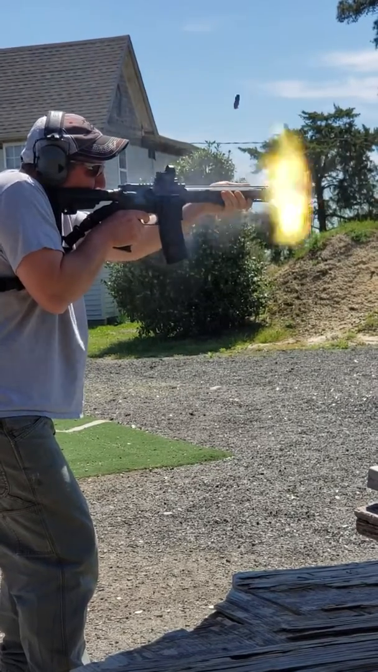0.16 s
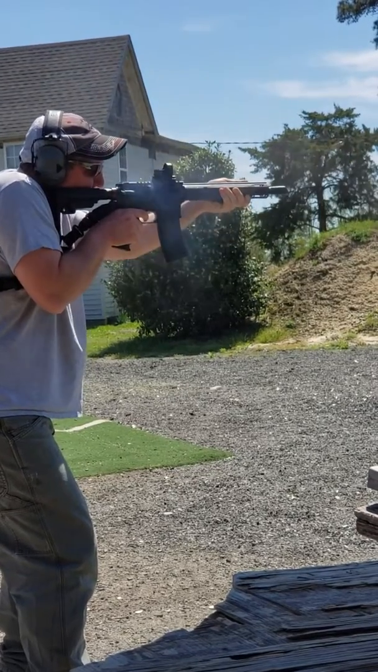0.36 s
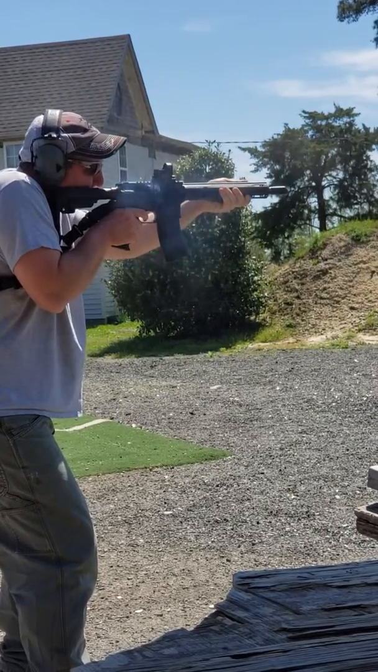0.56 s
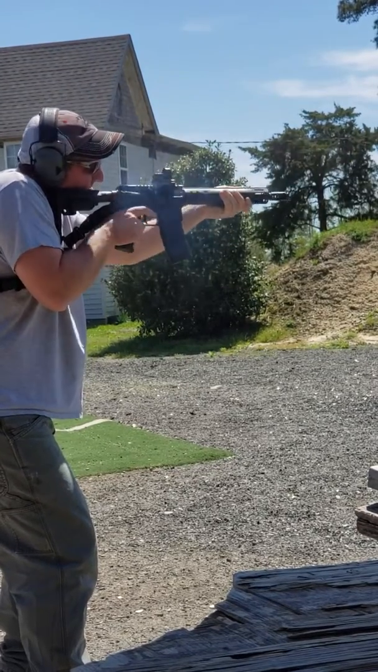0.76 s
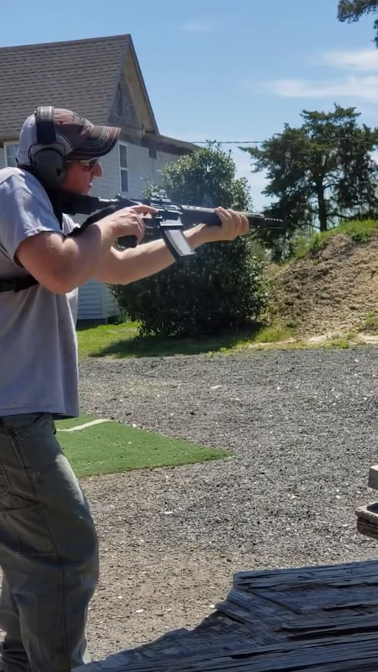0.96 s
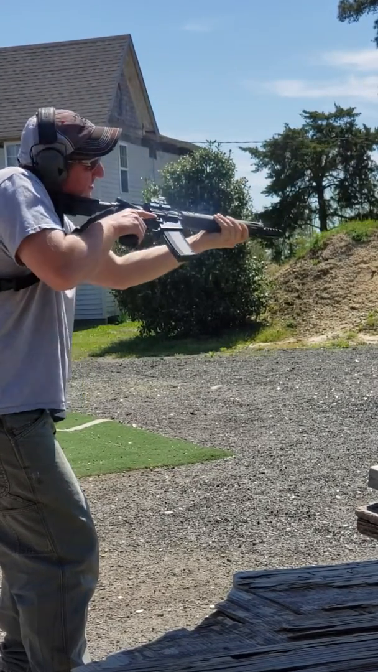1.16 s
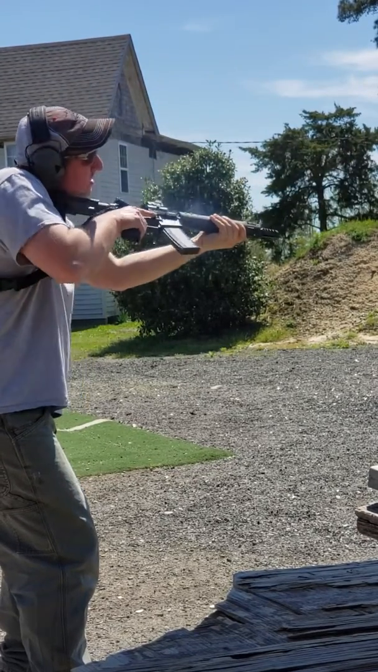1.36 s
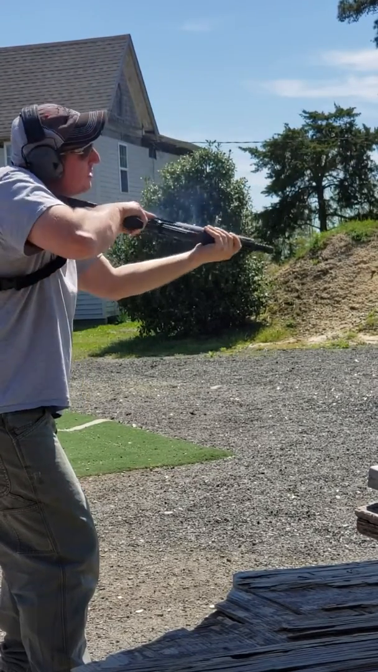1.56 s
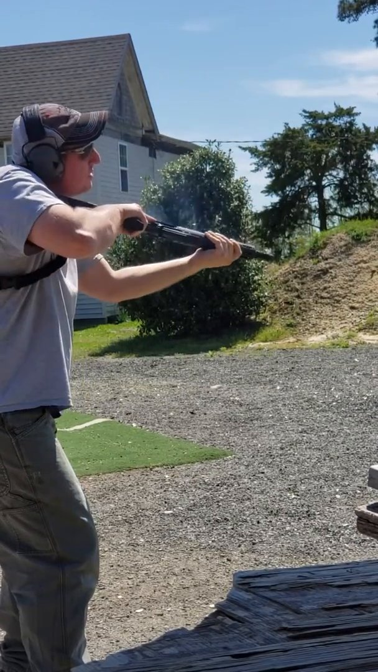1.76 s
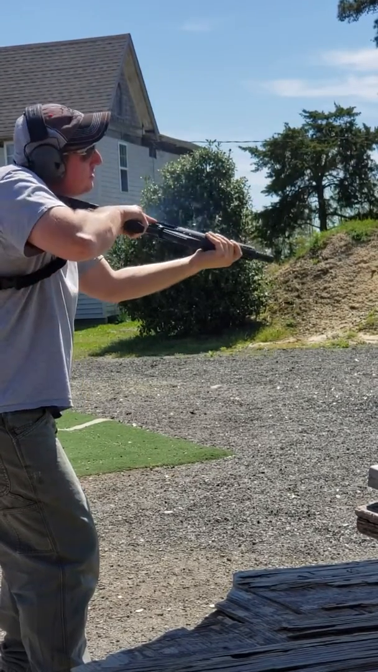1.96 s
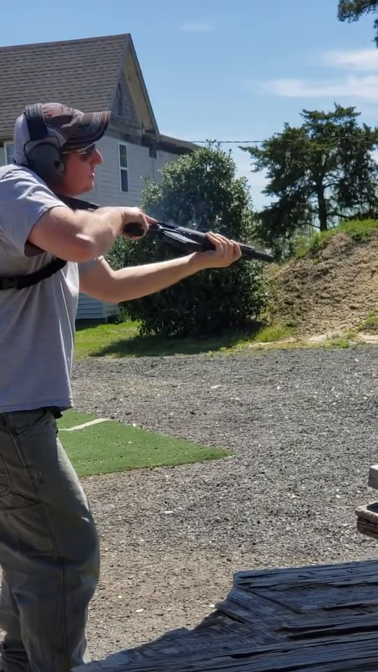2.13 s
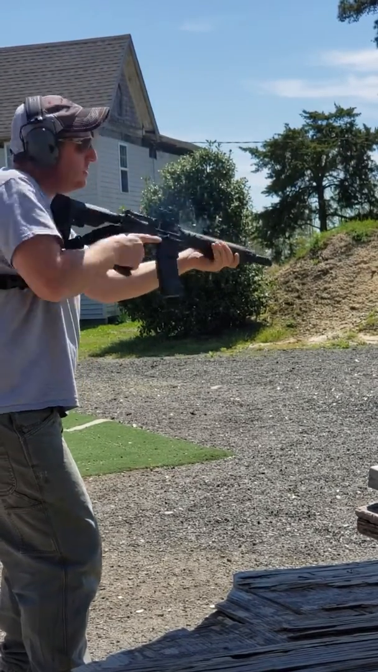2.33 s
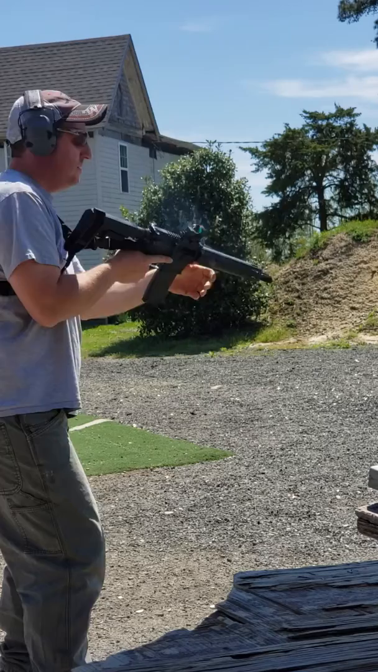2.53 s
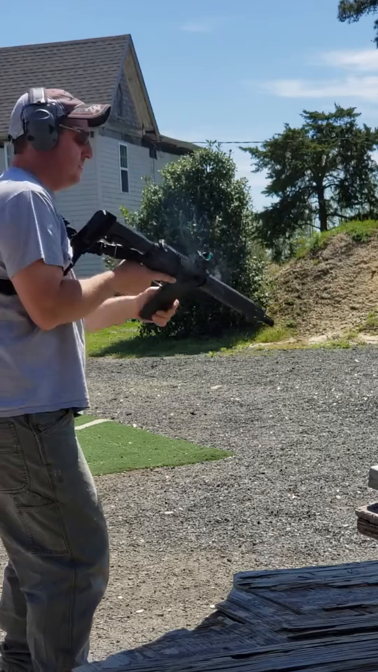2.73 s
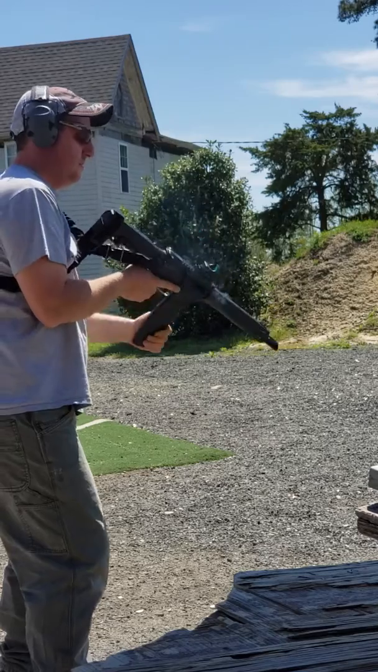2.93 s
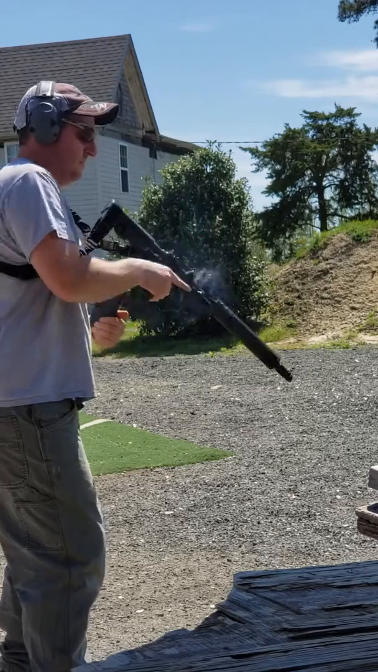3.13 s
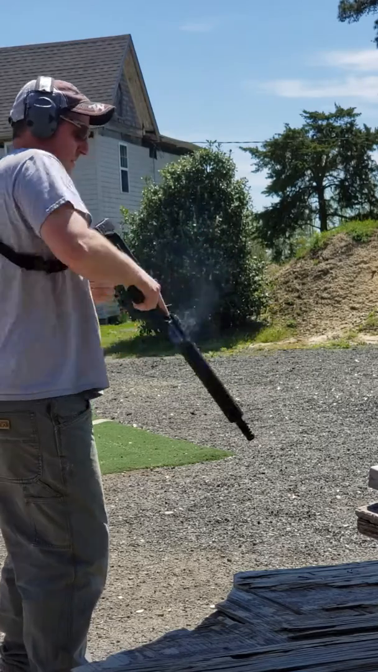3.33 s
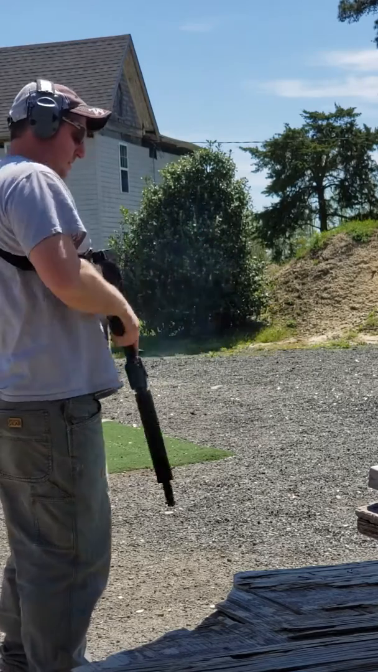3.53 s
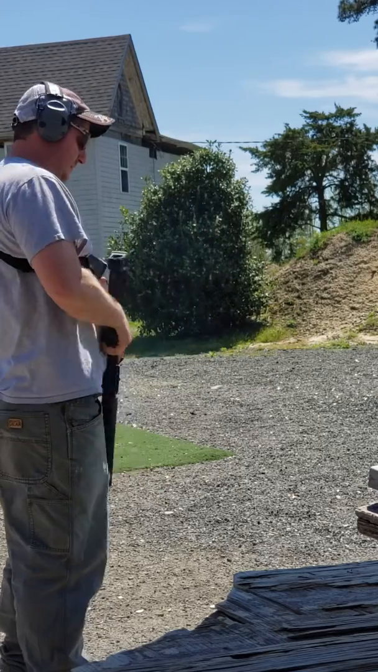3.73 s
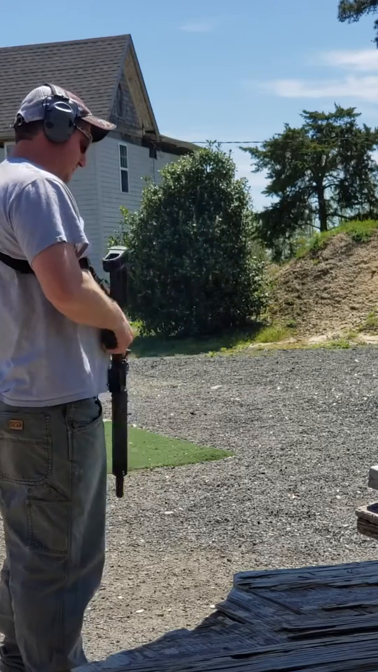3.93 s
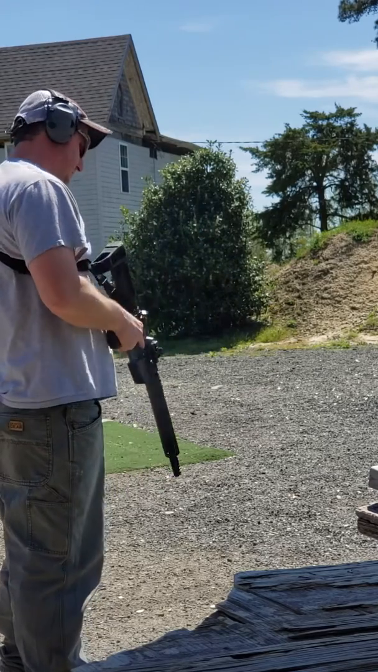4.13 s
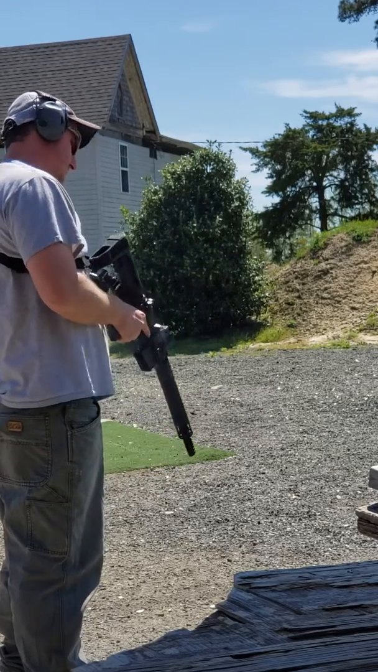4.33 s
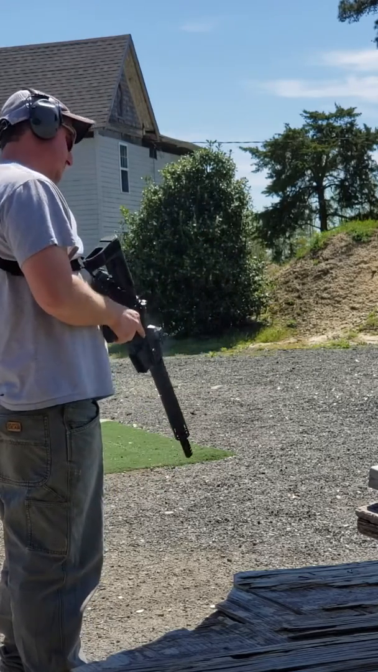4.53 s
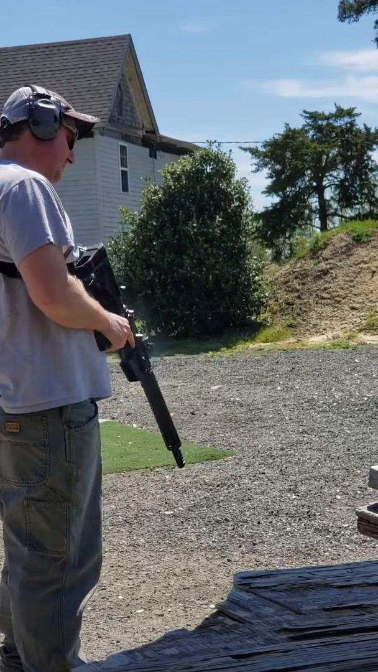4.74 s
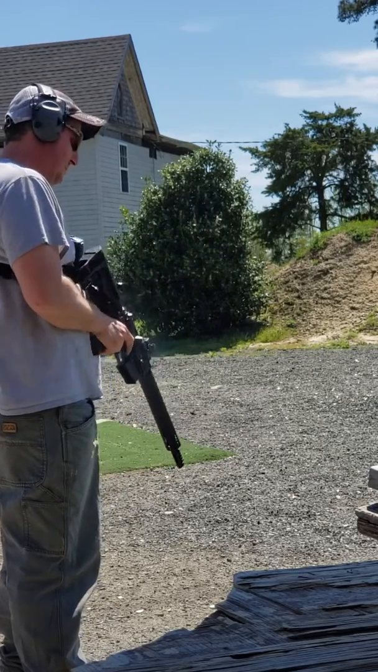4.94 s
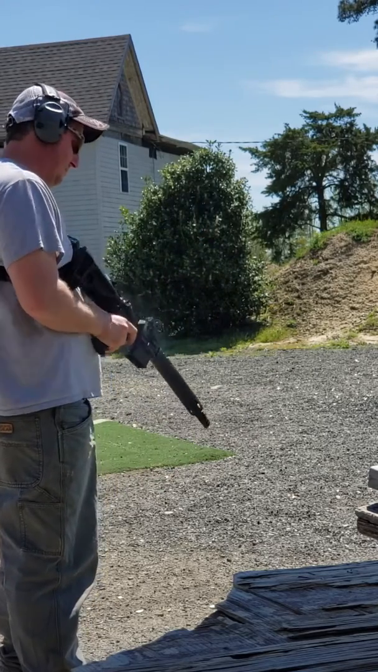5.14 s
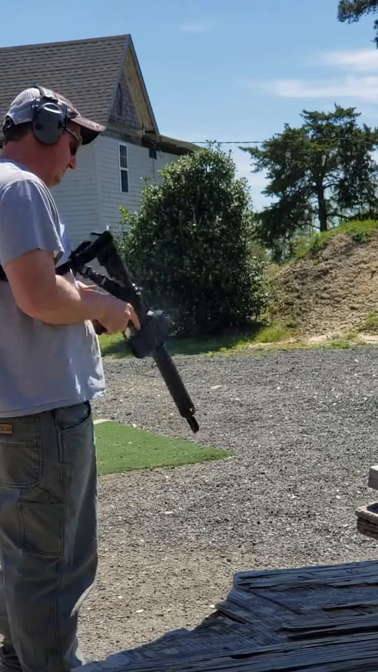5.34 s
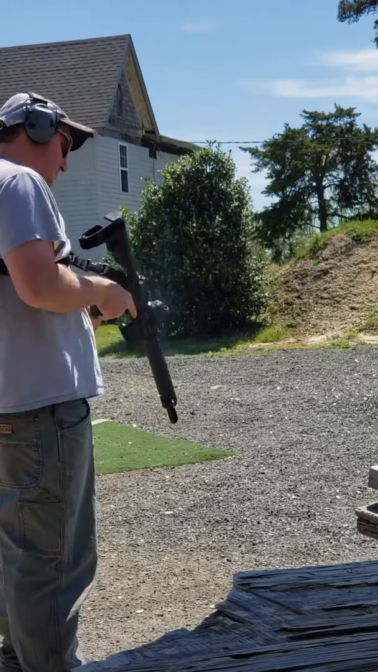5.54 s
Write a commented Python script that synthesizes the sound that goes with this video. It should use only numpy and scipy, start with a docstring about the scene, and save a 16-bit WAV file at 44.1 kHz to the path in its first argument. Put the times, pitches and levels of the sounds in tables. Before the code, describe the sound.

A firing line at an outdoor range, close stereo microphones under a roof, peaks slightly rounded. A near rifle blasts at the very start and again at 0.2 s, with a dense roar and hollow shelter ringing. Around 0.55 s the action clacks softly and brass tinkles; small cases skitter faintly until a light metal scrape at 1.4 s. A sharp loud gun cracks at 1.7 s, its rumble rolling away. A faint bullet smack at 2.2 s and a tiny bird chirp at 2.6 s precede a duller, farther shot at 2.7 s. Soft clacks near 3 s lead to a shot on the left at 3.1 s. Another sharp shot hits at 4.05 s, with dirt hissing at 4.5 s. Handling clicks from 4.8 s build to a hard, bright, ringing metal snap at 5.26 s, then a dull shot at 5.35 s and a sharp one at 5.67 s. Quiet air carries a barely audible thin whine.

```python
"""An outdoor rifle range, heard from under the roof of the firing line.
The nearest rifle fires twice and stops; its brass bounces on the ground and its action is worked by hand.
Other guns keep firing: a sharp one close by, one to the left and a duller one further off.
Each shot is a pressure wave, a roar of shaped noise that holds and dies, and a long uneven roll.
Bullets smack the bank as fading noise; metal rings in dying sines, and a far bird chirps once."""
import sys
import numpy as np
from scipy import signal
from scipy.fft import rfft, irfft
from scipy.io import wavfile
from scipy.ndimage import uniform_filter1d

SR = 44100
rng = np.random.default_rng(int(sys.argv[2]) if len(sys.argv) > 2 else 0)


def persist_wave(psi):
    """Save psi, clipped to +-1, as 16-bit WAV."""
    counts = np.round(np.clip(psi, -1, 1) * 32767).astype(np.int16)
    wavfile.write(sys.argv[1], SR, np.atleast_2d(counts).T)


N = 250914
HZ = np.fft.rfftfreq(2 * SR, 1 / SR)
AGE = np.arange(2 * SR) / SR  # time since a sound began, s
CRACK_S = 0.0013  # decay time of a muzzle crack

# relative spectral density of the nearest rifle's roar: f/Hz, level/dB per Hz
RIFLE_ROAR = [(29, -41.5), (50, -14), (408, -5.5), (545, -7), (601, -12), (729, -8.5), (997, -16.5),
              (1870, -17), (2380, -22), (6870, -28.5), (8750, -32), (14900, -26), (16000, -36.5)]
# the same for the sharp gun and the left one: f/Hz, level/dB per Hz
SHARP_ROAR = [(30, -26), (70, -16), (130, -7), (210, 0), (350, 1.5), (700, 1.5), (1400, -0.5), (2600, -3.5),
              (4750, -10.5), (7000, -8), (8700, -14.5), (12000, -11.5), (16000, -18.5)]
# the same for the dull, further gun: f/Hz, level/dB per Hz
DULL_ROAR = [(30, -29), (60, -3.5), (130, -1.5), (220, -0.5), (420, -2.5), (600, -4.5), (850, -11.5),
             (1150, -20.5), (1900, -15.5), (3500, -26), (7000, -27.5), (9000, -33.5), (13500, -36),
             (16000, -41.5)]
# roar by gun: colour table, tilt/dB per octave, build-up/s, factor on the decay time, usual roll level/dB
GUNS = {"rifle": (RIFLE_ROAR, .1, 0.00078, 0.9, -43), "sharp": (SHARP_ROAR, .1, 0.0058, 0.76, -44),
        "left": (SHARP_ROAR, 0.29, 0.0032, 0.81, -45.5), "dull": (DULL_ROAR, 1.5, 0.00024, 0.84, -27)}


def amp(db):
    """Level definition: 20 dB is a factor of ten in amplitude."""
    return 10 ** (np.asarray(db) / 20)


def evened(x):
    """Normalisation by mean power: scales to an rms of 1."""
    return x / np.sqrt(np.mean(x ** 2) + 1e-30)


def read(points, hz):
    """Linear interpolation of a table along a logarithmic frequency axis."""
    f, value = np.transpose(points)
    return np.interp(np.log(hz + 1), np.log(f + 1), value)


def add(mix, s, sound):
    """Superposition: adds a stereo sound to mix at time s, cut to fit."""
    start = round(s * SR)
    sound = sound[:, max(-start, 0):]
    part = mix[:, max(start, 0):][:, :sound.shape[1]]
    part += sound[:, :part.shape[1]]


def panned(left_db):
    """Constant-power panning: gains of the two channels for a left-right level difference."""
    ratio = np.atleast_1d(amp(left_db))
    return np.array([ratio, np.ones_like(ratio)]) * np.sqrt(2 / (1 + ratio ** 2))


def noise(colour, tilt_db=0, size=2 * SR, white=None):
    """Diffuse field: noise of rms 1, alike in the two channels in the bass, mostly unrelated in the treble."""
    # coherence of the channels: f/Hz, left-right correlation
    coherence = [(60, 0.95), (250, 0.92), (600, 0.3), (1400, 0.039), (14000, 0.23)]
    # balance of the channels: f/Hz, left minus right level/dB
    balance = [(60, -1), (300, 0.5), (800, 2.5), (2000, 3), (5000, 5), (14000, 0.5)]
    hz = np.fft.rfftfreq(size, 1 / SR)
    if white is None:
        white = rng.standard_normal((2, size))
    left, other = rfft(white)
    same = np.clip(read(coherence, hz), -1, 1)
    right = same * left + np.sqrt(1 - same ** 2) * other
    pair = np.array([left, right]) * panned(read(balance, hz))
    spectrum = amp(read(colour, hz) + tilt_db * np.log2(hz + 20))
    return evened(irfft(pair * spectrum, size))


def bunches(depth_db, size, order=260):
    """Fluctuating intensity: an uneven gain, in bunches about order samples long."""
    slow = uniform_filter1d(rng.standard_normal(size), size=order)
    return amp(depth_db * evened(slow))


def burst(colour, decay_s, tilt_db=0):
    """Impulsive excitation: coloured noise under an exponential decay."""
    size = SR // 8
    return noise(colour, tilt_db, size=size) * np.exp(-AGE[:size] / decay_s)


def ring(modes):
    """Modal decay: dying sines whose phases differ between the microphones, more so in the treble."""
    t = AGE[:SR]
    out = 0
    for hz, db, t60 in modes:
        own_phase = min(hz / 4000, 1) * rng.random((2, 1))
        cycles = hz * t + rng.random() + own_phase
        out = out + amp(db - 60 * t / t60) * np.sin(2 * np.pi * cycles)
    return out


def fade_by_band(x, envelope, count=10):
    """Frequency-dependent decay: overlapping bands that sum to x each get their own envelope(hz)."""
    centres = np.geomspace(40, 15000, count)
    z = rfft(x)
    out = 0
    for hz in centres:
        weight = read(np.c_[centres, centres == hz], HZ)  # 1 at this centre, 0 at its neighbours
        out = out + irfft(z * weight) * envelope(hz)
    return out


def background():
    """Broadband ambience and frequency modulation: quiet outdoor air with a thin, slightly wavering whine."""
    # relative spectral density of the air: f/Hz, level/dB per Hz
    air_colour = [(20, -6), (70, -4), (170, -16), (400, -18.5), (1000, -23.5), (2000, -32), (4500, -43),
                  (9000, -52.5), (16000, -52.5)]
    air_db, whine_db = -72, -78.5
    whine_hz, whine_width_hz = 1196, 1.8  # centre and rms deviation
    waver = evened(uniform_filter1d(rng.standard_normal(N), size=1500))
    phase = 2 * np.pi * np.cumsum(whine_hz + whine_width_hz * waver) / SR
    whine = np.sin(phase) * bunches(3.2, size=N, order=1800)
    return amp(air_db) * noise(air_colour, size=N) + amp(whine_db) * evened(whine)


def pressure_wave(suction=1.0):
    """Shock (N) wave: a steep rise, a ramp down into suction and a quick return."""
    corners_s = [0, .0003, .0029, .0035, .0043]
    return np.interp(AGE, corners_s, [0, 1, -suction / 2, -suction, 0])


def thump(hz=60, decay_s=0.013):
    """Damped oscillation: the deep swing of air that goes with the blast."""
    return -np.sin(2 * np.pi * hz * AGE) * np.exp(-(AGE / decay_s) ** 2 / 2)


def blast(gun):
    """Direct sound: crack, pressure wave and thump straight from the muzzle."""
    # by gun: crack level/dB, pressure wave level/dB, thump level/dB, left minus right of the last two/dB
    direct = {"rifle": (-14.5, -19, -22.5, -4), "sharp": (-11.5, -9, -15.5, 3.5),
              "left": (-8, -11.5, -11, 20.5), "dull": (-27.5, -15.5, -36.5, 2.5)}
    crack_db, wave_db, thump_db, left_db = direct[gun]
    out = (amp(wave_db) * pressure_wave() + amp(thump_db) * thump()) * panned(left_db)
    add(out, 0, amp(crack_db) * burst(GUNS[gun][0], CRACK_S, tilt_db=2.5))
    return out


def reflections(colour, per_s=260, spread_db=4):
    """Sparse echoes: slaps from posts, benches and trunks, mostly small, a few large; rms 1."""
    sizes = amp(spread_db * np.minimum(rng.exponential(1, (2, len(AGE))), 4))
    signs = rng.choice([-1, 1], sizes.shape)
    taps = sizes * signs * (rng.random(sizes.shape) < per_s / SR)
    slap = burst(colour, 0.0024, tilt_db=2.0)
    return evened(signal.oaconvolve(taps, slap, axes=1)[:, :len(AGE)])


def shot(paths, gun, roar_db, hold_s):
    """Two-stage decay: after the blast, a roar stays level, then dies and leaves a long roll."""
    # decay of the roar ahead of the gun's factor: f/Hz, t60/s
    roar_t60 = [(60, 0.77), (200, .68), (500, 0.59), (1500, 0.59), (5000, 0.48), (14000, .35)]
    # decay of the roll: f/Hz, t60/s
    roll_t60 = [(60, 4.6), (250, 1.8), (1500, 2.07), (5000, 1.15), (14000, 0.56)]
    # colour of the roll re the roar's colour: f/Hz, level/dB
    roll_colour = [(60, 6), (200, 2.5), (600, -2), (2000, 1.5), (5000, 4), (14000, -12)]
    # slap off a wall by gun: delay t/s, level re roar/dB
    wall_echo = {"rifle": (0.14, -28.5), "sharp": (0.03, 0.93), "left": (0.045, 5), "dull": (.091, -1.2)}
    # modes of the shelter: f/Hz, level/dB, t60/s
    shelter_modes = [(129, -32, .55), (214, -23, .7), (330, -20, .68), (366, -23, .45), (408, -18, .5),
                     (528, -21, .45), (579, -26, .45), (696, -22, .45), (736, -26, .45), (837, -25, .4)]
    # how strongly each gun sets the shelter ringing: level re roar/dB
    shelter_db = {"rifle": 14.5, "sharp": -7, "left": -10, "dull": 3}
    # a steel part of the shelter that sings on faintly: f/Hz, level re roar/dB, t60/s
    steel_post = [(2455, -43, 1.7)]
    usual_hold_s, roll_db_per_doubling = .03, 5.5  # a roar that holds longer has a louder roll
    colour, tilt_db, build_s, linger, usual_roll_db = GUNS[gun]
    wall_s, echo_db = wall_echo[gun]
    roll_db = usual_roll_db + roll_db_per_doubling * np.log2(hold_s / usual_hold_s)
    swells = bunches(1.5, size=len(AGE), order=2600)  # the roll swells and sinks slowly and unevenly

    def envelope(hz):
        """Power sum of the held roar and the swelling roll, with a gradual build-up."""
        roar_age = np.maximum(AGE - hold_s, 0)
        roar = amp(roar_db - 60 * roar_age / (linger * read(roar_t60, hz)))
        roll = amp(roll_db + read(roll_colour, hz) - 60 * AGE / read(roll_t60, hz))
        return np.hypot(roar, roll * swells) * (1 - np.exp(-AGE / build_s))

    white = paths[gun] + rng.standard_normal((2, len(AGE)))  # half of its power repeats from shot to shot
    diffuse = noise(colour, tilt_db, white=white) * bunches(1.3, size=len(AGE))
    slaps = amp(-9.0) * reflections(colour) * (1 - np.exp(-AGE / 0.15))
    out = fade_by_band(diffuse + slaps, envelope)
    add(out, wall_s, amp(roar_db + echo_db) * burst(colour, 2 * CRACK_S, tilt_db=2.0))
    shelter_rise = 1 - np.exp(-AGE[:SR] / 0.018)
    add(out, .012, amp(roar_db + shelter_db[gun]) * ring(shelter_modes) * shelter_rise)
    add(out, 0, amp(roar_db) * ring(steel_post))
    return out + blast(gun)


def clack(db, tilt_db, ring_t60=0.4):
    """Impact excitation of modes: a broad snap, then the fading, rattling ring of the receiver."""
    # relative spectral density of the snap: f/Hz, level/dB per Hz
    snap_colour = [(100, -14.5), (300, -13.5), (1000, -5), (2000, -7), (4300, -10), (7200, -0.5),
                   (10500, -11.5), (13100, -4.5), (16000, -19)]
    # relative spectral density of the receiver's close-packed ring: f/Hz, level/dB per Hz
    steel_colour = [(200, -19), (2000, -9.5), (4800, -8.5), (6200, -3), (7500, -2), (8500, -11.5),
                    (11500, -8.5), (13200, -10.5), (16000, -18)]
    # clearest notes of the receiver: f/Hz, level/dB, t60/s
    receiver_modes = [(3900, -10, .2), (5565, -5, .3), (6840, -7, .35), (7390, -1.5, 0.34),
                      (11500, -2, .25), (12200, -8, .35), (12900, -3.5, .3)]
    receiver_db = -8.5  # the notes re the close-packed ring
    # a firm blow is short; a softer touch scrapes for longer and leaves more of its sound in the ring
    firm_db, firm_decay_s, softer_db_per_doubling = -30, 0.0034, 17
    firm_ring_db, ring_db_per_softer_db = -21, 0.192
    t = AGE[:SR // 2]
    softer_db = firm_db - db
    decay_s = firm_decay_s * 2 ** (softer_db / softer_db_per_doubling)
    ring_db = firm_ring_db + ring_db_per_softer_db * softer_db
    rattle = noise(steel_colour, size=len(t)) * bunches(1.3, size=len(t))
    out = rattle * amp(ring_db - 60 * t / ring_t60)
    add(out, 0, amp(ring_db + receiver_db) * ring(receiver_modes))
    add(out, 0, burst(snap_colour, decay_s, tilt_db))
    return amp(db) * out


def bouncing(modes, hop_s, count=3):
    """Inelastic bouncing: a case rings anew at each landing, each hop shorter and weaker than the last."""
    hop_shrink, hop_loss_db = .7, 12.5
    out, s = np.zeros((2, SR)), 0
    for hop in range(count):
        add(out, s, amp(-hop_loss_db * hop) * ring(modes))
        s += hop_s * hop_shrink ** hop
    return out


def scrape(edge_s=.02):
    """Sliding friction: metal catches unevenly on metal, as gated noise of wavering level."""
    # relative spectral density of the scrape: f/Hz, level/dB per Hz
    scrape_colour = [(500, -21.5), (1400, -2.5), (2000, 0), (2600, -3), (3500, -17.5), (9000, -34.5)]
    length_s, scrape_db = .33, -80.5
    t = AGE[:SR // 2]
    gate = np.clip(np.minimum(t, length_s - t) / edge_s, 0, 1)
    catching = noise(scrape_colour, size=len(t)) * bunches(2.5, size=len(t), order=700)
    return amp(scrape_db) * catching * gate


def strike(db, hold_s, tilt_db, rise_s=.002):
    """Impact noise with treble dying first: a distant smack smears into a hiss of flying dirt."""
    # relative spectral density of the dirt: f/Hz, level/dB per Hz
    dirt_colour = [(150, -21), (400, -8.5), (1000, -2.5), (2800, -7), (6600, -2), (9500, -6.5),
                   (13900, -5.5), (16000, -11)]
    # decay of the spray: f/Hz, t60/s
    dirt_t60 = [(1000, 1.0), (5000, 0.39), (14000, 0.23)]

    def envelope(hz):
        """Exponential decay after the hold."""
        return amp(-60 * np.maximum(AGE - hold_s, 0) / read(dirt_t60, hz))

    spray = fade_by_band(noise(dirt_colour, tilt_db), envelope)
    return amp(db) * spray * (1 - np.exp(-AGE / rise_s))


def chirp():
    """Frequency glide: a far bird's pure note swells, glides up and fades."""
    length_s, from_hz, to_hz, chirp_db = 0.069, 3390, 3620, -80
    u = np.minimum(AGE / length_s, 1)
    hz = from_hz + (to_hz - from_hz) * u ** 2
    tone = np.sin(2 * np.pi * np.cumsum(hz) / SR)
    return amp(chirp_db) * np.sin(np.pi * u) ** 2 * tone * panned(0)


def scene():
    """Superposition of shots, gun handling, brass, bullet strikes and a bird over the air of the range."""
    # shots: t/s, gun, roar level/dB, time the roar holds/s
    shots = [(-0.008, "rifle", -13.5, .055), (0.2014, "rifle", -12.5, 0.043), (1.7321, "sharp", -14, 0.013),
             (2.7227, "dull", -25, 0.0039), (3.129, "left", -19.5, 0.057), (4.0507, "sharp", -12, 0.029),
             (5.341, "dull", -25, 0.008), (5.6711, "sharp", -12.5, 0.041)]
    # clacks of the bolt and magazine: t/s, force level/dB, tilt/dB per octave
    clacks = [(0.5545, -38, -4), (0.657, -41.5, -6.5), (1.87, -35, 5), (2.366, -73, -7), (2.489, -70, -6),
              (2.9364, -50, -3), (2.9598, -46, -4.5), (3.03, -48, -6), (4.767, -52, 3), (4.821, -33, 3.5),
              (5.036, -68, 9), (5.101, -51.5, -2.5), (5.2448, -34, 12), (5.256, -29, 0.5),
              (5.260, -16.5, 3), (5.266, -22, 6), (5.2762, -32, 1), (5.582, -38, -6.5)]
    # spent cases landing: t/s, level/dB, time to the next landing/s
    cases = [(0.556, -55, 0.092), (0.888, -76, .067), (1.41, -69.5, .055)]
    # modes of a case: f/Hz, level/dB, t60/s
    brass_modes = [(10680, -4.5, .28), (14880, 0, .2), (15050, -6.5, .2)]
    # lower modes of a case skittering on the hard floor: f/Hz, level/dB, t60/s
    skitter_modes = [(3810, -0.5, 1.1), (4720, -5.5, .8), (5270, -7, .47), (5565, -6, 0.45),
                     (6250, 2, 0.35), (6700, -2, 0.39)]
    # bullets throwing up dirt on the bank: t/s, level/dB, time the spray holds/s, tilt/dB per octave
    strikes = [(2.202, -60.5, 0.0021, -3.5), (3.554, -60.5, 0.11, -5.5), (4.482, -41.5, 0.045, 0)]
    mix = background()
    # each gun has a noise pattern of its own that recurs in all its shots
    paths = {gun: rng.standard_normal((2, len(AGE))) for gun in GUNS}
    for s, *row in shots:
        add(mix, s, shot(paths, *row))
    for s, *row in clacks:
        add(mix, s, clack(*row))
    for s, db, hop_s in cases:
        add(mix, s, amp(db) * bouncing(brass_modes, hop_s))
    add(mix, 0.79, amp(-75) * bouncing(skitter_modes, hop_s=.19))
    add(mix, 1.41, scrape())
    for s, *row in strikes:
        add(mix, s, strike(*row))
    add(mix, 2.585, chirp())
    return mix


def record(dry, low_cut_hz=28, edge_hz=15900):
    """Transducer limits: the microphones lose the deepest bass and round off peaks; then the band limit."""
    high_pass = signal.butter(1, low_cut_hz, "highpass", fs=SR, output="sos")
    dry = signal.sosfilt(high_pass, dry)
    rounded = dry / (1 + dry ** 6) ** (1 / 6)
    low_pass = signal.firwin(255, edge_hz, window=("kaiser", 9), fs=SR)
    return signal.oaconvolve(rounded, low_pass[None], "same")


dry = scene()
out = record(dry)
persist_wave(out)
```